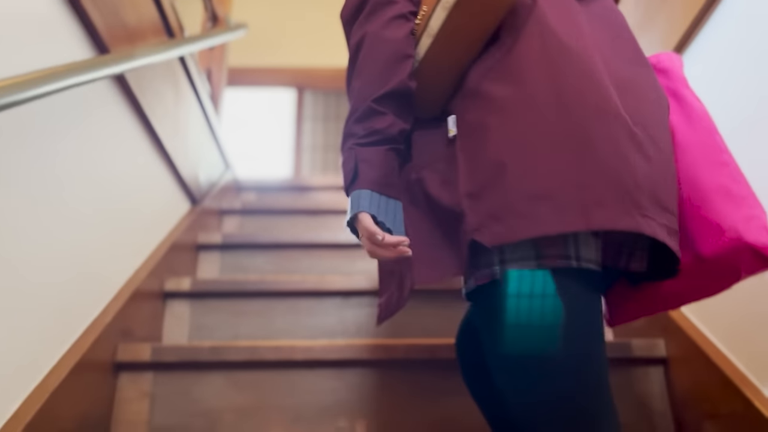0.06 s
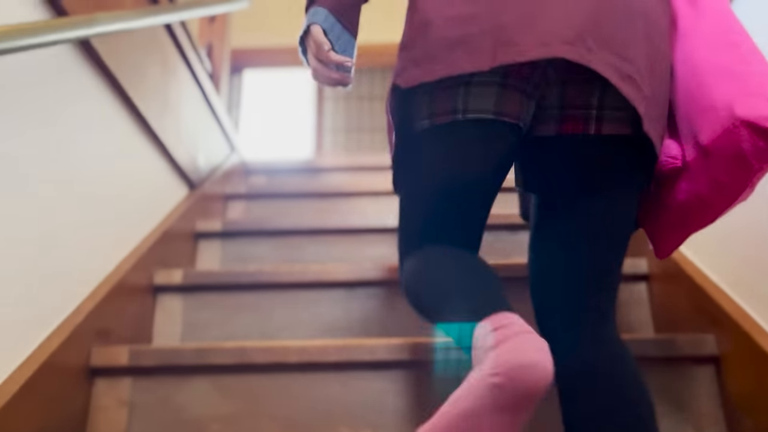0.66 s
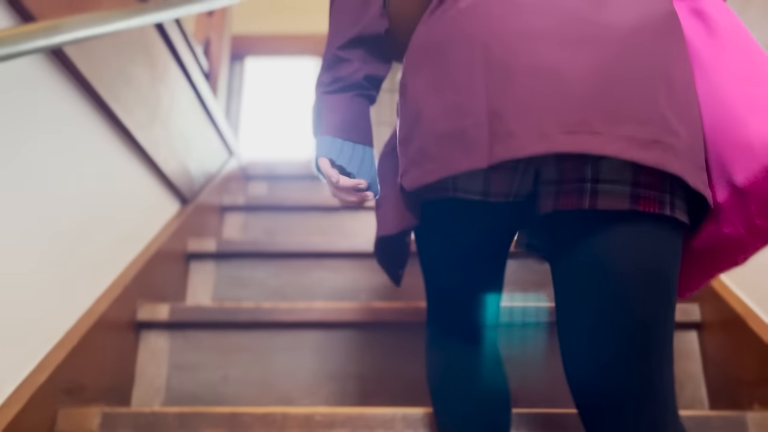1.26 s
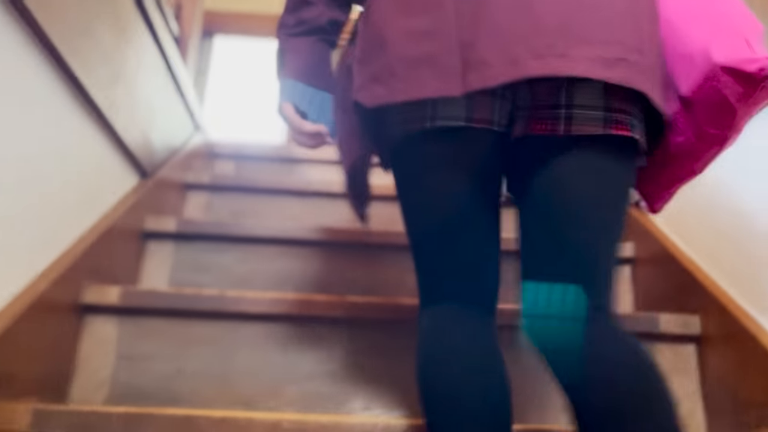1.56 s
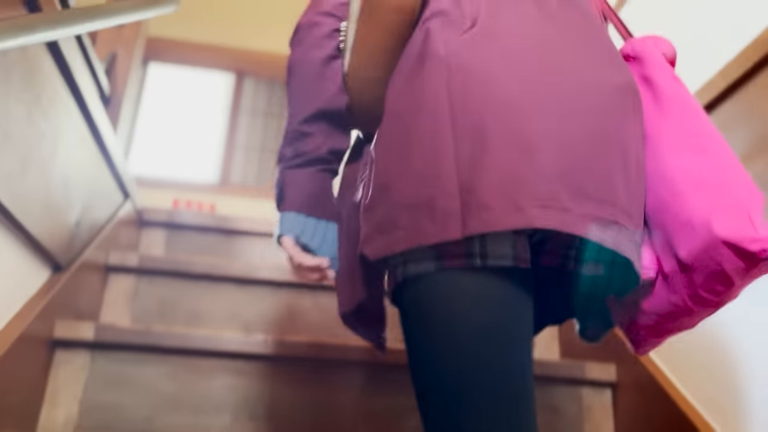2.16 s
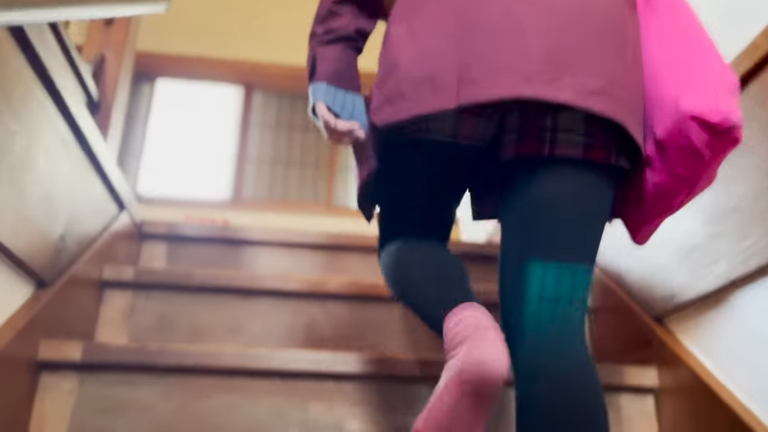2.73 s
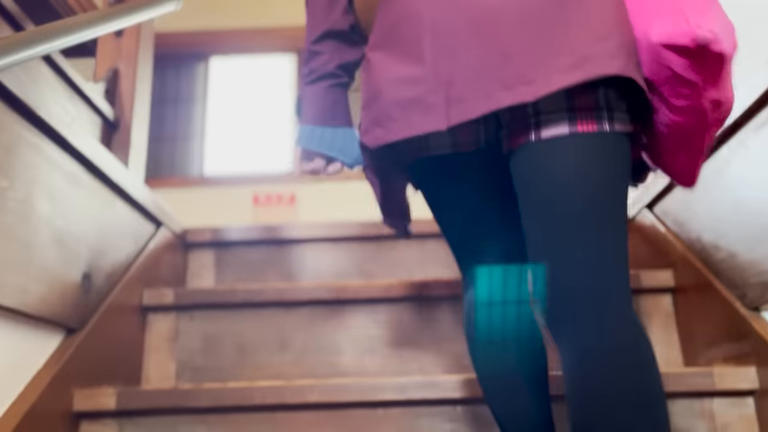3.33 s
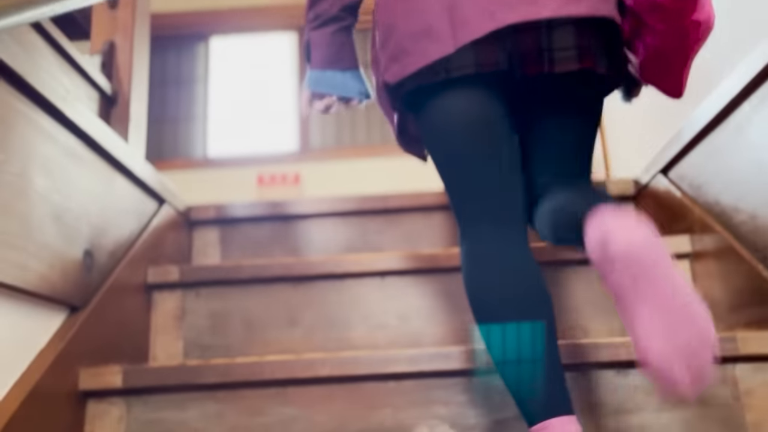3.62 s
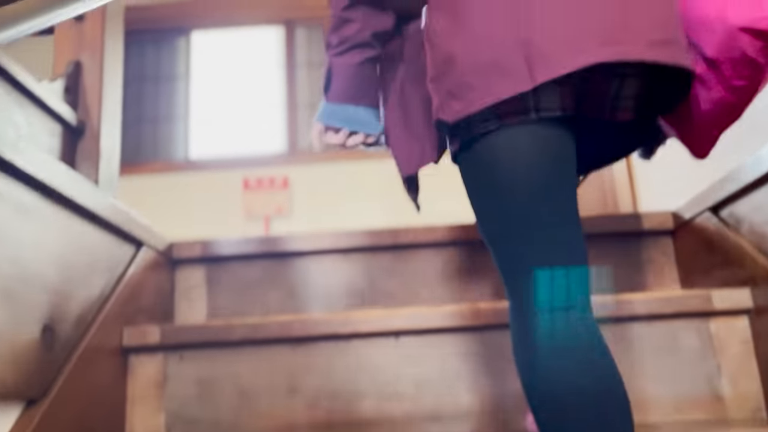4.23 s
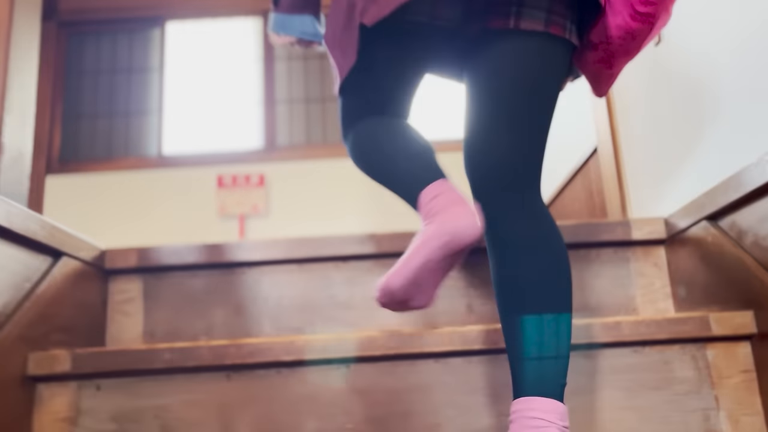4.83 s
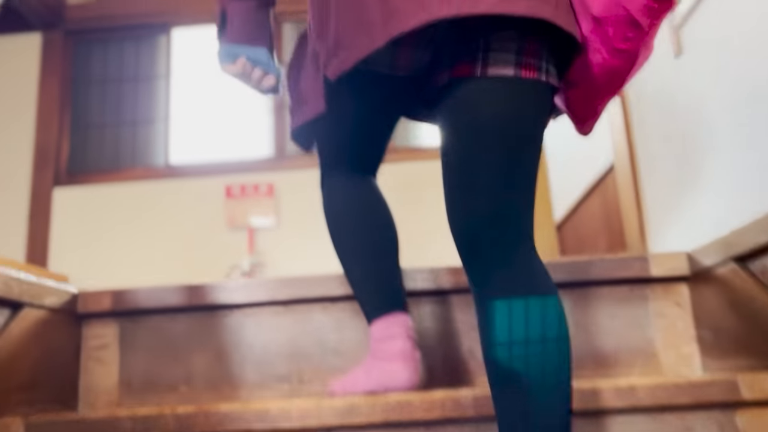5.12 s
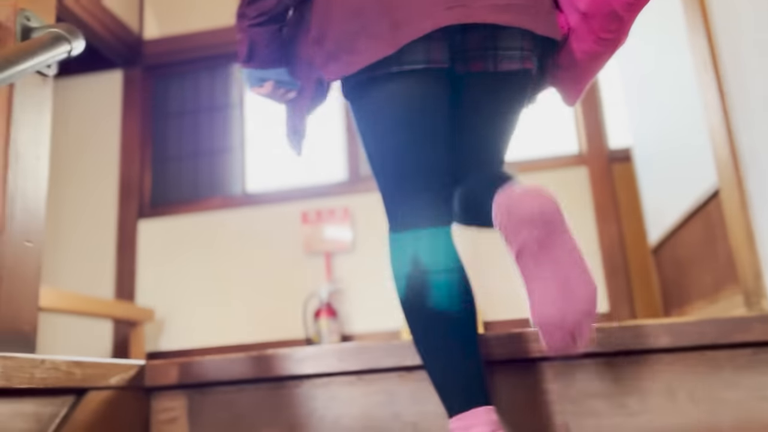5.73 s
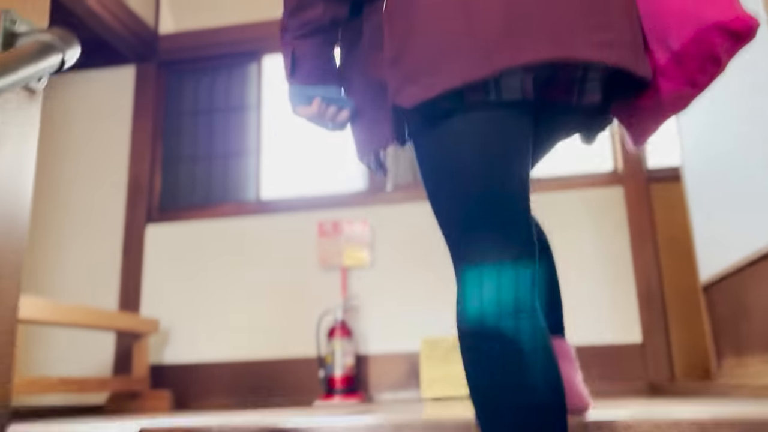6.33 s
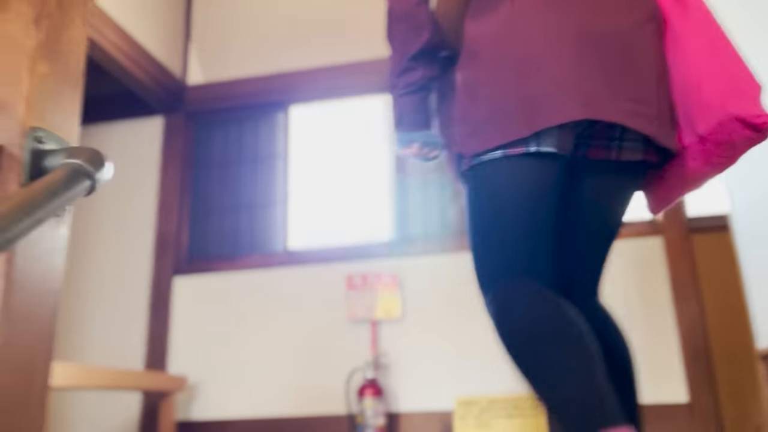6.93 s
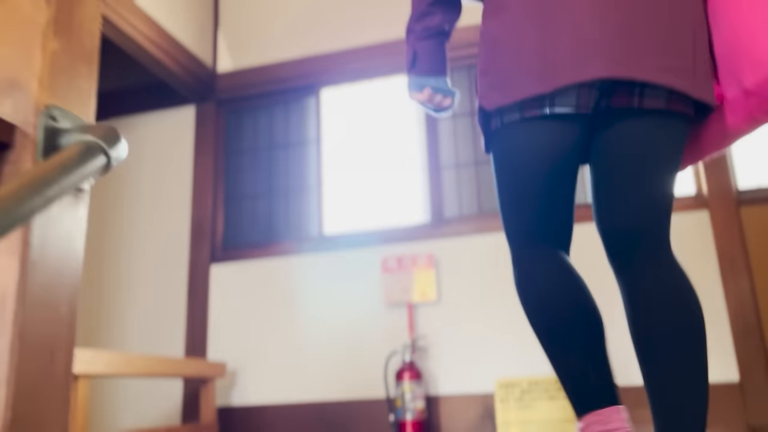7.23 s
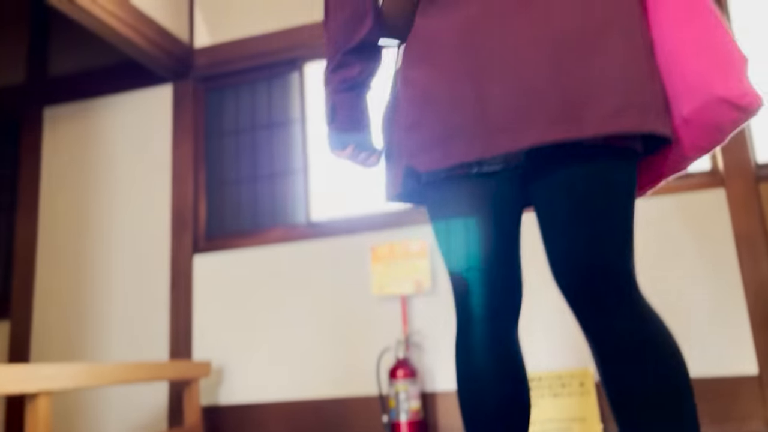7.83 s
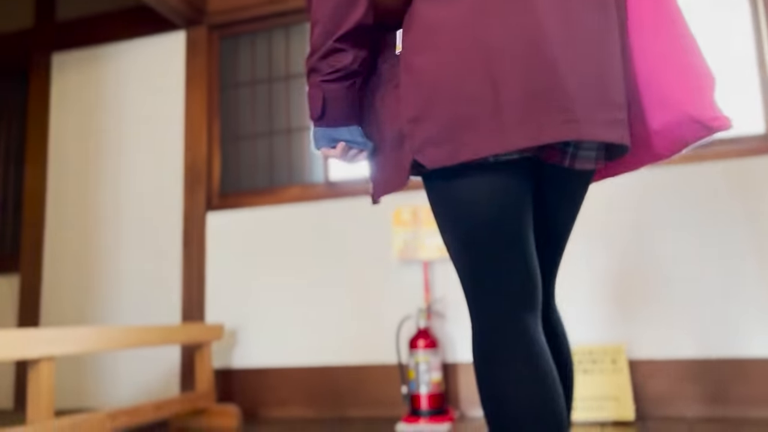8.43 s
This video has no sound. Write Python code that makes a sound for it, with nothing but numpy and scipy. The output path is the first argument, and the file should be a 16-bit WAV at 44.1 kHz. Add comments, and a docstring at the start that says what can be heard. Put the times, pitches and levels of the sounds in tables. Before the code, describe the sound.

Padded footsteps knock and thump unevenly up a wooden staircase, heard from nearby in a narrow indoor stairwell with brief reverberation. The treads creak under the weight and their joints pop in little clusters, growing louder in the second half. Faint cloth rustle and a few soft sole slides sit underneath, along with a low room rumble. The climb ends in crackling, creaking boards and a few strong snaps.

```python
"""Old wooden stairs snap and creak as someone in soft footwear climbs them.
The creaks are stick-slip friction in the loaded treads; the snaps are joints letting go, each with
its own note. Every footfall thumps the low modes of the stair frame and knocks on a tread.
Soles scuff and clothes swish over a low background rumble, and the narrow stairwell adds a
short reverberant tail."""
import sys
import numpy as np
from scipy import signal
from scipy.fft import rfft, irfft
from scipy.io import wavfile
from scipy.ndimage import uniform_filter1d

SR = 44100
rng = np.random.default_rng(int(sys.argv[2]) if len(sys.argv) > 2 else 0)


def int16_out(signal):
    """Quantize to a 16-bit WAV file."""
    q = np.round(np.clip(np.atleast_2d(signal).T, -1, 1) * 32767)
    wavfile.write(sys.argv[1], SR, q.astype(np.int16))


N = 378016
TIME = np.arange(N) / SR

# loaded treads creak: start_s, length_s, swell_s, level_db, brightness_db, note_hz, note_db
TREAD_CREAKS = [ (0.39, 0.088, .004, -31.5, -0.5, 623, -7), (0.492, 0.16, .004, -28, 0, 565, -15),
                (0.72, 0.056, .005, -31, -1.5, 328, -7.5), (1.124, 0.17, .004, -31.5, 2.5, 322, -7),
                (1.477, 0.083, 0.038, -38, 5, 466, -15), (1.609, 0.058, 0.016, -30.5, 2.5, 423, -9),
                (1.725, 0.11, 0.037, -37.5, 5, 210, -5), (1.925, 0.18, 0.051, -44.5, 10.5, 348, -14),
                (3.223, 0.12, 0.12, -30.5, -24, 365, -5), (4.029, 0.2, 0.029, -25.5, -1, 627, -5.5),
                (4.288, 0.094, .015, -30, 2, 530, -7), (4.513, 0.046, 0.013, -25.5, 1.5, 422, -9.5),
                (4.821, 0.13, 0.049, -24.5, -3, 457, -7.5), (5.018, 0.099, .003, -30, 0.5, 442, -6.5),
                (6.061, 0.025, .003, -31, 2.5, 480, -7), (6.146, 0.08, .014, -26.5, 3.5, 629, -11),
                (6.528, 0.15, 0.092, -24.5, -9.5, 378, -17), (6.658, 0.085, 0.039, -23.5, 0.5, 145, -11),
                (7.105, 0.051, 0.0026, -26, 1, 518, -8.5), (7.388, 0.16, 0.09, -23, -4, 530, -11),
                (7.574, 0.28, 0.043, -26, -1, 325, -21.5), (7.79, 0.43, 0.036, -29, -3, 129, -4.5),
                (8.211, 0.12, .004, -30, 3, 313, -5), (8.423, 0.16, .02, -23.5, -9, 204, -10)]
# joints let go: start_s, level_db, body_db, edge_db, note_hz
JOINT_SNAPS = [ (0.2501, -21.5, 1, 6, 1080), (0.395, -29, 0, 2, 930), (.488, -23, 2.5, 1.5, 1160),
               (1.105, -18, -8, -5, 904), (1.354, -31.5, -31, 15, 1510), (2.055, -28.5, -5, 1.5, 1050),
               (2.135, -26.5, -2.5, -15, 865), (2.172, -20, -6, -7, 820), (2.271, -21.5, -1.5, 4, 850),
               (2.783, -28, -4.5, -11, 1470), (2.857, -17.5, -0.5, 4, 1390),
               (2.924, -25.5, -14, 10.5, 1780), (3.215, -21, -8, -1.5, 1000), (3.238, -21, -6, 3, 870),
               (3.2748, -21.5, -4, 6, 890), (3.312, -21, -2, 3.5, 1270), (3.682, -39, 5.5, 5, 905),
               (4.188, -20.5, -1, 2, 950), (4.264, -20.5, -3, 0, 1040), (4.284, -18, -5, 1, 1570),
               (4.377, -23, 0, -4, 1330), (4.561, -13, -4.5, 2, 1523), (5.2343, -25.5, 1.5, 15, 1640),
               (5.3102, -20, -8, -5, 1490), (6.153, -12, -10.5, -8.5, 920), (6.315, -15, -6, -4, 1337),
               (6.653, -16, -25, 2.5, 1510), (6.828, -14, -2, 10, 880), (7.107, -31.5, 10.5, 14, 1590),
               (7.653, -15, -15, 2, 1330), (8.205, -9.5, 2.5, -2.5, 987), (8.418, -24.5, 7.5, 6.5, 970),
               (8.488, -19.5, 4.5, -4, 1280), (8.525, -12, 3.5, -7, 1150)]
# a foot loads the stairs: start_s, frame_db, frame_hz, knock_db, tread_hz
FOOTFALLS = [(0.493, -26, 65.6, 0, 174), (0.728, -23, 51.4, 3.5, 243), (1.085, -24.5, 76, -16, 200),
             (2.275, -50, 63, -4.5, 212), (3.315, -41, 60, -3, 197), (3.872, -32, 67.4, -9, 181),
             (4.044, -33, 69.5, 4, 203), (4.155, -27.5, 74, 2.5, 168), (4.66, -20, 76.3, 0.5, 208),
             (5.026, -25.5, 95.4, 3.5, 191.7), (5.067, -41, 90, 5, 206), (5.909, -25.5, 62.7, -16.5, 243),
             (6.19, -44, 71, 2.5, 173), (6.392, -28.5, 74.4, -17, 175), (6.833, -45, 71.3, 7, 180)]
# wood fibres let go: start_s, level_db, centre_hz
FIBRE_TICKS = [(0.056, -21, 3900), (0.172, -21, 10000), (2.661, -21.5, 1490), (4.053, -26, 1940),
               (4.11, -16, 1920), (4.932, -16.5, 3480), (7.762, -14.5, 5000), (7.833, -12.5, 1980),
               (7.869, -13.5, 1800), (7.905, -19, 3020), (7.927, -11, 2330), (7.951, -19, 3520),
               (7.99, -11, 2080), (7.995, -8, 1700), (8.041, -7, 1670), (8.068, -18, 4100)]
# response of the boards to a blow: centre_hz, density_db, t60_s
BOARD_BANDS = [(71.1, -6.5, 0.12), (128, -4, 0.24), (220, -5, 0.052), (289, 0, 0.095), (425, 3, 0.1),
               (660, -3, 0.073), (932, -3, 0.045), (1133, -9, 0.085), (1440, -8, 0.075), (1768, -16, 0.078),
               (3590, -24, 0.053), (6170, -30, 0.031), (14100, -40, 0.028)]
# prominent modes of a tread: centre_hz, width_hz, gain_db
TREAD_MODES = [(218.3, 60, 7.5), (447, 30, 1), (652, 41, 1.5)]
# a sole slides on a tread: start_s, length_s, level_db
SOLE_SCUFFS = [(0.705, 0.16, -38), (1.09, 0.29, -39), (6.572, 0.32, -42)]
# clothes brush as a leg swings: middle_s, half_length_s, level_db
LEG_SWISHES = [(0.095, 0.053, -58.5), (0.564, 0.056, -53), (0.79, 0.11, -56), (1.676, 0.31, -61),
               (2.867, 0.11, -56.5), (3.52, 0.11, -53), (4.645, 0.12, -55), (5.15, 0.19, -59.5),
               (6.02, 0.17, -52.5), (6.237, 0.16, -53), (7.142, 0.1, -49.5), (7.544, 0.19, -56.5),
               (8.547, 0.064, -52)]
# spectrum of rubbing cloth: frequency_hz, density_db
CLOTH_SPECTRUM = [(300, 10), (1200, 8), (2500, 11), (4500, 13.5), (6500, 7.5), (10000, 7), (13000, 8),
                  (15500, -9)]
# reverberation of the stairwell: centre_hz, tail_db, t60_s
STAIRWELL_BANDS = [(83, -5.5, 0.038), (208, -3, 0.43), (403, -1, 0.49), (1050, -5.5, 0.59),
                   (2840, -4.5, 0.68), (6800, -11, 0.46), (14000, -12, 0.13)]
# spectrum of the background rumble: frequency_hz, density_db
RUMBLE_SPECTRUM = [(30, -38), (45, -4.5), (62, -2.5), (85, -11.5), (300, -26), (900, -54.5)]
# spectrum of the room tone: frequency_hz, density_db
AIR_SPECTRUM = [(40, -19), (150, 0.5), (400, 1), (900, -7), (1500, -7), (2000, -16), (6000, -22),
                (15000, -66)]
# the microphone's stereo image: frequency_hz, coherence, left_lead_rad, left_over_right_db
STEREO_IMAGE = [(140, .95, 0, .7), (450, .5, 0, 0), (900, .05, 0, 1), (1450, .05, 0, -5), (1900, .55, 0, 1),
                (4800, .5, 0, 5.5), (6800, .45, -1.1, 3), (7600, .95, -2.6, 0), (12000, .98, -6.28, 0),
                (15200, .96, -9.2, 0)]


def creak(length_s, swell_s, level_db, bright_db, note_hz, note_db, settle_s=.42, rub_s=.0055):
    """Stick-slip friction: a train of slips drives the tread, slowing and fading as it settles."""
    first_rate = 102 * 2 ** ((level_db + 26) / 19)  # slips per second, faster in a louder creak
    last_rate = first_rate * np.exp(-length_s / settle_s)
    rates = np.linspace(first_rate, last_rate, max(round((first_rate - last_rate) * settle_s), 2))
    jitter, sizes, grit, catches = rng.standard_normal((128, 4))[:len(rates)].T
    gaps = np.exp(.25 * jitter) / rates
    slip_s = (np.cumsum(gaps) - gaps) * length_s / gaps.sum()
    swell = np.minimum((slip_s + .019) / swell_s, 1)
    load = amp(level_db - 7.5 * slip_s / length_s + 3 * sizes) * swell
    # each slip is a clean knock in the bass, a brief rub of fibres in the treble and a dry tick
    knocks, rubs, ticks = np.zeros((3, int(length_s * SR) + 1))
    at = (slip_s * SR).astype(int)
    knocks[at] = load * np.sqrt(SR / rates)
    rubs[at] = load * np.sqrt(SR / first_rate) * amp(4 * grit)
    ticks[at] = load * amp(2.5 * np.log2(first_rate / rates) + 4 * catches)  # slower slips tick harder
    rub_power = signal.lfilter([1], [1, -np.exp(-1 / (rub_s * SR))], rubs ** 2) / (rub_s * SR)
    rub = np.sqrt(rub_power) * rng.standard_normal(SR)[:len(rub_power)]
    roll, out = np.linspace(0, np.pi / 2, len(rub)), 0
    for weight in np.cos(roll), np.sin(roll):  # the load rolls from one spot of the board to another
        hz, wood = board()
        tilt_db = log_interp(hz, [120, 300, 500, 1400, 5000], [2.5, 0, 0, bright_db, bright_db - 3])
        note = amp(note_db) * rfft(mode(note_hz, t60_s=.086))
        response = wood * tread(hz) * amp(tilt_db) + note
        rough = log_interp(hz, [800, 2500], [0, 1])
        for drive, share in (knocks, 1 - rough), (rub, rough):
            out += signal.fftconvolve([drive * weight], irfft(response * np.sqrt(share)), axes=1)
        tick = fibre_tick(bright_db - 1, rng.uniform(700, 1330))
        out += signal.fftconvolve([ticks * weight], tick, axes=1)
    return out


def joint_snap(level_db, body_db, edge_db, note_hz, ring_cycles=45):
    """Impulse excitation: a joint lets go at once, ringing its own note and a hollow one in the tread."""
    hz, wood = board()
    edge_hz = 3800 * np.exp(.077 * rng.standard_normal())
    response = wood * tread(hz) * resonance(hz, edge_hz, width_hz=200, gain_db=4)
    tilt_db = log_interp(hz, [200, 550, 1100, 2000, 5000], [body_db - 8, body_db, 0, 0, edge_db])
    crack = irfft(response * amp(tilt_db))
    hollow = amp(body_db - 7) * mode(454.5 * rng.uniform(.892, 1.138), t60_s=.033, lag_s=.00394)
    front = fibre_tick(edge_db / 2 - 17, centre_hz=2400)
    note = amp(-11) * mode(note_hz, ring_cycles / note_hz)
    return amp(level_db + 22) * (front + crack + note + hollow)


def frame_thump(level_db, pitch_hz, t60_s=.25, rise_s=.013):
    """Damped free vibration: a footfall swings the frame in a low mode and a weaker, shorter upper one."""
    t = np.arange(SR // 2) / SR
    low = np.sin(2 * np.pi * pitch_hz * t)
    upper = amp(-10 - 60 * t / .13) * np.sin(2 * np.pi * pitch_hz * 2.2 * t)
    envelope = amp(level_db + 4.5 - 60 * t / t60_s) * (1 - np.exp(-t / rise_s))
    return envelope * (low + upper)


def tread_knock(level_db, tread_hz, cutoff_hz=300):
    """A padded impact acts as a low-pass: it wakes the tread's low modes, and the bending mode booms."""
    hz, wood = board()
    thud = amp(5) * irfft(wood / (1 + (hz / cutoff_hz) ** 2))
    boom = amp(-2) * mode(tread_hz, t60_s=.12)
    return amp(level_db) * (thud + boom)


def fibre_tick(level_db, centre_hz, t60_s=.024, body_hz=550, size=8192):
    """Sudden release: fibres give a burst of band noise; the lower it is, the more the board joins in."""
    burst = rng.standard_normal((2, size)) * amp(-60 * np.arange(size) / SR / t60_s)
    splinter = signal.lfilter(*signal.iirpeak(centre_hz, Q=2, fs=SR), burst)
    splinter /= np.linalg.norm(splinter, axis=1, keepdims=True)
    hz, wood = board()
    body = irfft(wood * hz ** 2 / (hz ** 2 + body_hz ** 2))
    coupling = amp(17) / (1 + (centre_hz / (2 * body_hz)) ** 2)
    return amp(level_db) * (splinter + coupling * body)


def board(delay_at_1khz_s=.0022):
    """Dispersion: low bending waves arrive later. Gives the unit-energy spectrum of one spot of wood."""
    centres = np.transpose(BOARD_BANDS)[0]
    hz, wood = dense_modes(BOARD_BANDS, delay_at_1khz_s * (1000 / centres) ** .7, size=8192)
    wood *= np.minimum(hz / centres[0], 1) ** 3  # steep fall below the lowest mode
    return hz, wood / np.sqrt(np.mean(abs(wood) ** 2))


def tread(hz):
    """Modal filtering: a few resonances of the tread stand out from the rest of the wood."""
    return np.prod([resonance(hz, *row) for row in TREAD_MODES], axis=0)


def resonance(hz, centre_hz, width_hz, gain_db):
    """Resonance: one mode lifts the response around its natural frequency."""
    return 1 + (amp(gain_db) - 1) / (1 + 2j * (hz - centre_hz) / width_hz)


def mode(pitch_hz, t60_s, lag_s=0, size=8192):
    """A damped oscillator of unit energy, heard a quarter cycle apart at left and right."""
    t = np.maximum(np.arange(size) / SR - lag_s, 0)
    ring = np.exp(2j * np.pi * pitch_hz * t) * (1 - np.exp(-t * pitch_hz)) * amp(-60 * t / t60_s)
    return np.array([ring.imag, ring.real]) / np.linalg.norm(ring.real)


def dense_modes(bands, delays_s, size):
    """Modal overlap: close modes merge into decaying noise, band by band. Gives two spectra."""
    centres, levels_db, t60s = np.transpose(bands)
    t, hz, total = np.arange(size) / SR, np.fft.rfftfreq(size, 1 / SR), 0
    for share, delay, t60 in zip(np.eye(len(bands)), delays_s, t60s):
        band = np.sqrt(log_interp(hz, centres, share))
        decay = (t >= delay) * amp(-60 * np.maximum(t - delay, 0) / t60)
        ring = band * rfft(rng.standard_normal((2, size)) * decay)
        total += ring * np.linalg.norm(band) / np.linalg.norm(ring, axis=1, keepdims=True)
    return hz, total * amp(log_interp(hz, centres, levels_db))


def scuffs(grain_db=3):
    """Sliding friction: soft soles cross the wood grain, in noise that swells fast and fades slower."""
    strokes = sum(amp(db) * np.interp(TIME, [start, start + length / 4, start + length], [0, 1, 0])
                  for start, length, db in SOLE_SCUFFS)
    grain = amp(grain_db * flicker(60))
    return noise([(150, -23), (1000, 9), (4500, 2), (14000, -14)]) * strokes * grain


def clothes(rustle_db=-63.5, grain_db=1.3, flutter_db=2.5):
    """Friction noise of cloth on cloth: smooth swishes and a faint, wavering rustle add in power."""
    grain = amp(3.5 + grain_db * flicker(200))
    rustle_power = amp(rustle_db + flutter_db * flicker(3000)) ** 2
    swish_power = sum(amp(db) ** 2 * np.exp(-((TIME - middle) / half) ** 2)
                      for middle, half, db in LEG_SWISHES)
    return noise(CLOTH_SPECTRUM) * np.sqrt(rustle_power + swish_power) * grain


def stairwell(source, first_echo_s=.0083, positions=4, drift_hz=.4545):
    """Reverberation: close walls return a short, dense tail whose pattern shifts as the walker climbs."""
    out = 0
    for k in range(positions):
        _, tail = dense_modes(STAIRWELL_BANDS, [first_echo_s] * len(STAIRWELL_BANDS), size=32768)
        share = np.maximum(np.cos(2 * np.pi * (drift_hz * TIME - k / positions)), 0)
        out += signal.fftconvolve(source * share, irfft(tail), axes=1)[:, :N]
    return out


def background(rumble_db=-42.5, air_db=-49):
    """Stationary noise: a low background rumble under a soft room tone."""
    return amp(rumble_db) * noise(RUMBLE_SPECTRUM) + amp(air_db) * noise(AIR_SPECTRUM)


def stereo_image(sound):
    """Coherence: the microphone's channels match in the bass, differ midway, are out of step on top."""
    points, *columns = np.transpose(STEREO_IMAGE)
    hz = np.fft.rfftfreq(N, 1 / SR)
    coherence, lead_rad, left_db = (log_interp(hz, points, column) for column in columns)
    left, other = rfft(sound)
    right = (coherence * left + np.sqrt(1 - coherence ** 2) * other) * np.exp(-1j * lead_rad)
    return irfft(np.array([left * amp(left_db / 2), right * amp(-left_db / 2)]), N)


def noise(spectrum):
    """Spectral shaping: two uncorrelated noises of one colour, rms 1."""
    gain = amp(log_interp(np.fft.rfftfreq(N, 1 / SR), *np.transpose(spectrum)))
    shaped = irfft(rfft(rng.standard_normal((2, N))) * gain, N)
    return shaped / shaped.std()


def flicker(samples):
    """A moving average of noise: a random fluctuation of unit deviation."""
    smooth = uniform_filter1d(rng.standard_normal(N), size=samples)
    return smooth / smooth.std()


def amp(db):
    """Decibels to amplitude ratio."""
    return 10 ** (np.asarray(db) / 20)


def log_interp(hz, points, values):
    """Linear interpolation over log frequency."""
    return np.interp(np.log(hz + 1), np.log(np.abs(points) + 1), values)


def add(mix, start_s, sound):
    """Superposes a sound on the mix from start_s."""
    part = mix[..., max(round(start_s * SR), 0):][..., :sound.shape[-1]]
    part += sound[..., :part.shape[-1]]


def scene():
    """Superposition: the wood and its reverberation, soles, clothes, background and thumping frame."""
    wood, ticks, frame = np.zeros((2, N)), np.zeros((2, N)), np.zeros(N)
    for start_s, *row in TREAD_CREAKS:
        add(wood, start_s, creak(*row))
    for start_s, *row in JOINT_SNAPS:
        add(wood, start_s, joint_snap(*row))
    for start_s, *row in FIBRE_TICKS:
        add(ticks, start_s, fibre_tick(*row))
    for start_s, frame_db, frame_hz, knock_db, tread_hz in FOOTFALLS:
        add(frame, start_s, frame_thump(frame_db, frame_hz))
        add(wood, start_s, tread_knock(knock_db, tread_hz))
    ambience = background()
    tail = stairwell(wood + amp(-2.5) * ticks)
    return stereo_image(wood + ticks + tail + scuffs() + clothes() + ambience) + frame


def record(dry):
    """Band limiting: a linear-phase low-pass removes the highest treble."""
    low_pass = signal.firwin(511, cutoff=15600, window=("kaiser", 9), fs=SR)
    return signal.oaconvolve(dry, low_pass[None], "same")


dry = scene()
out = record(dry)
int16_out(out)
```